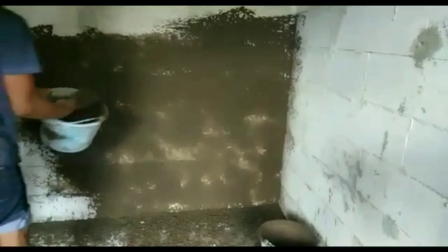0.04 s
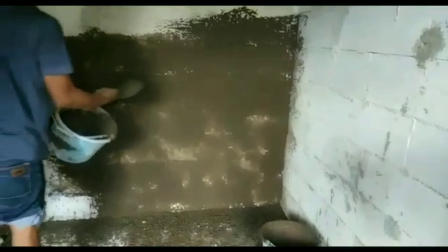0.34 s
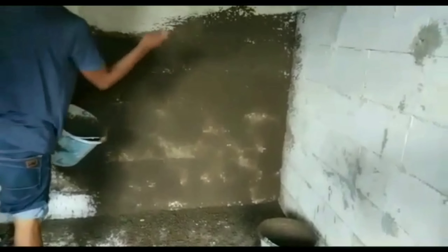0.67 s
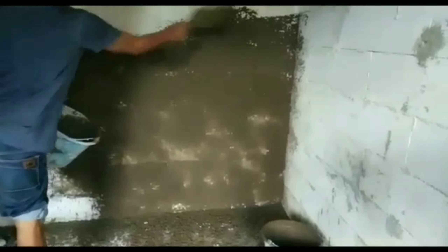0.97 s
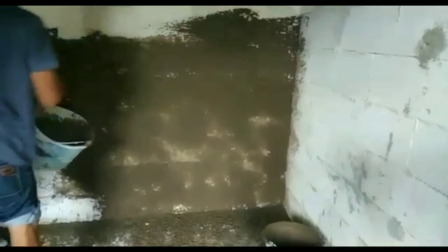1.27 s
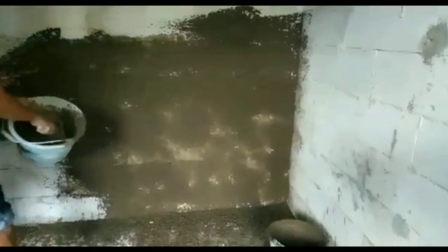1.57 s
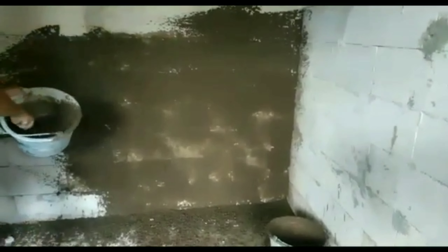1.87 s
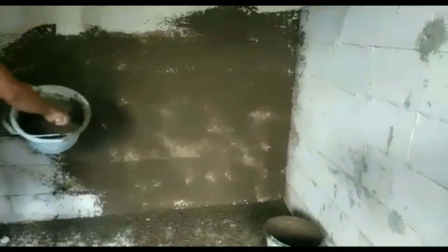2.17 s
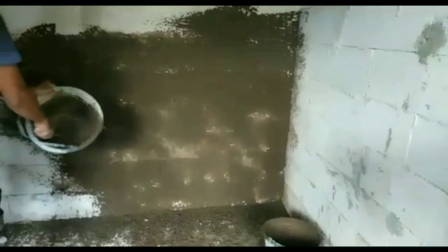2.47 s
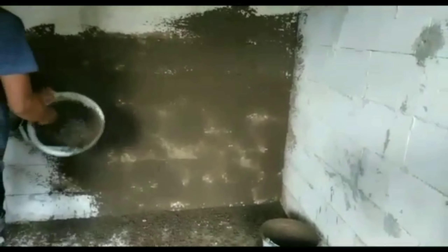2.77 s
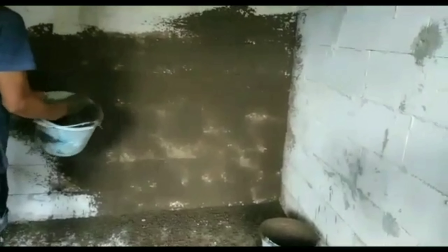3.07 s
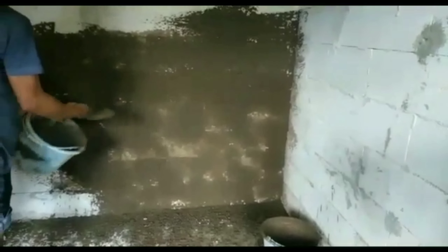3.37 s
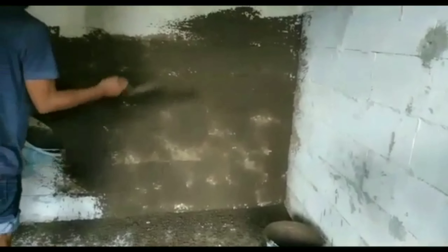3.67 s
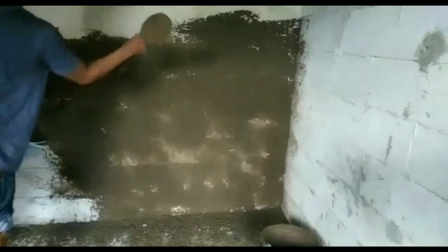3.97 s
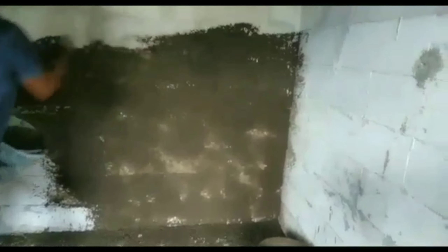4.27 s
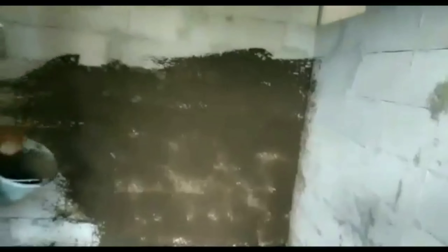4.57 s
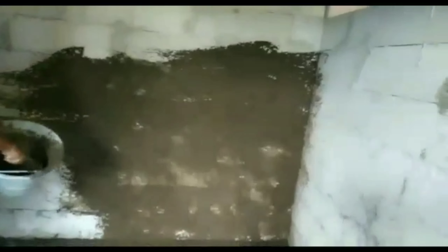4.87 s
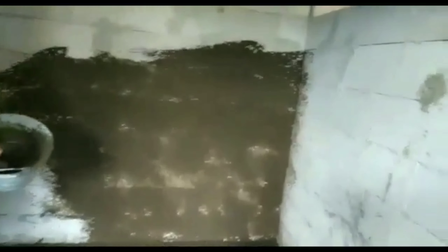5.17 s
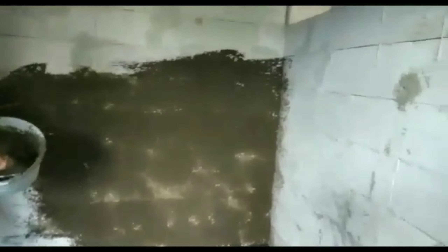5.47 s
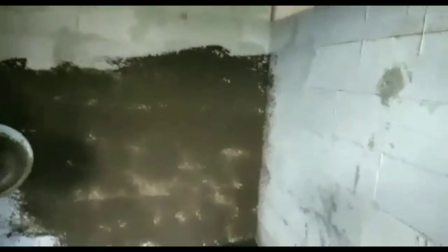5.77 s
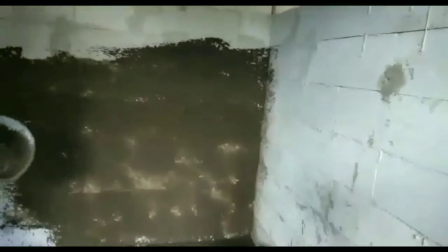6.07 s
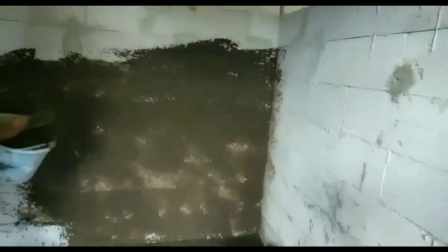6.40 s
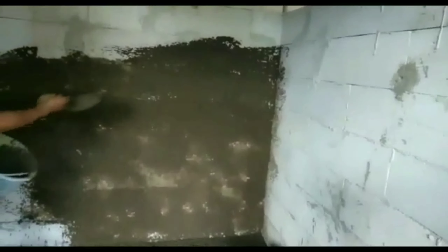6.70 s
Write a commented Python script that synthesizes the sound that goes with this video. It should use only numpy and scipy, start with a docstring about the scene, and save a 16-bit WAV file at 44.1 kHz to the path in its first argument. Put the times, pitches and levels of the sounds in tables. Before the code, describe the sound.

A steel trowel scrapes wet mortar in a plastic bucket and twice slaps a load onto a wall in an echoing room.

```python
"""In a small bare room, a plasterer scoops wet mortar from a plastic bucket and flings it twice at a wall.
The steel trowel grinds through sand, chatters and knocks the bucket, which rings. Each load swishes
through the air and hits the blocks with a slap and a thud, and crumbs tick down. The walls echo,
a low rumble lies underneath, and the microphone makes the highest sounds brighter."""
import sys
import numpy as np
from scipy import signal
from scipy.fft import rfft, irfft
from scipy.io import wavfile

SR = 44100
rng = np.random.default_rng(int(sys.argv[2]) if len(sys.argv) > 2 else 0)


def inscribe(sig):
    """Save sig as 16-bit PCM at rate SR to the path in sys.argv[1].

    A 1-D sig is mono; a 2-D sig holds one channel per row.
    Samples are clipped to [-1, 1] before scaling.
    """
    pcm = np.round(np.clip(np.atleast_2d(sig).T, -1, 1) * 32767)
    wavfile.write(sys.argv[1], SR, pcm.astype(np.int16))


N = 297234
TIME = np.arange(N) / SR

# Table levels are set before mixing. A "t60" is the time in seconds a sound takes to fade by 60 dB.
# loads thrown at the wall:
# (landing time [s], slap [dB], thud [dB], swing length [s], swish [dB], sliding mortar [dB])
THROWS = [(1.065, -24.5, -31.5, 0.046, -45, -51.5), (4.2218, -27.5, -36, 0.14, -42, -59.5)]
# the blade hits the bucket or stabs the mortar; the spot it meets sets the note:
# (time [s], level [dB], gritty edge [dB], note [Hz])
KNOCKS = [(0.213, -38, -93, 831), (1.694, -31, -56, 963), (1.739, -32, -61, 705), (1.796, -29, -40, 780),
          (1.862, -26.5, -52, 927), (1.889, -31, -59, 1280), (2.31, -36.5, -48.5, 783),
          (2.361, -32.5, -48.5, 895), (2.654, -26, -45, 961), (3.231, -42, -60, 736),
          (3.476, -40, -63, 1085), (4.567, -40.5, -46, 1018), (4.841, -39.5, -58, 845),
          (5.157, -37.5, -52.5, 836), (5.63, -48, -63.5, 894), (5.94, -53, -68, 924),
          (6.053, -53, -74, 1286)]
# tone colours of hissing sand, a soft swish and a dull knock: (frequency [Hz], level [dB])
SAND_TONE = [(600, -6), (2000, 2.5), (4000, 0.5), (7000, 3), (10000, -1), (15500, -9)]
SWISH_TONE = [(200, -19), (600, -6), (1000, -5.5), (1350, -5), (2200, -3), (3500, -10.5), (7000, -24),
              (15000, -40)]
KNOCK_TONE = [(90, -28), (350, -4), (900, 1.5), (1500, -2), (2500, -6.5), (4000, -14.5), (10000, -37)]


def scooping():
    """The blade catches and slips over sand: it churns the mortar, rasps and hisses."""
    # tone colours of wet mortar and of the scraping blade: (frequency [Hz], level [dB])
    sludge_tone = [(40, -48.5), (130, -9.5), (205, -12.5), (300, 0), (470, -0.5), (800, 3.5), (1100, -2.5),
                   (1800, -11), (3500, -35), (9000, -56)]
    rasp_tone = [(400, -17.5), (900, -2.5), (1400, 0.5), (1900, -3), (2500, -7), (3300, -11.5),
                 (5000, -20.5), (12000, -48.5)]
    slips = judder(per_s=51, depth_db=4.5)
    churning, grating = (slips * grains(per_s=1800, spread_db=3.5) for _ in range(2))
    sludge = tint(strokes("pressure", release_s=0.04) * churning, sludge_tone)
    rasp = tint(strokes("rasp", release_s=0.051) * grating, rasp_tone)
    # wet sand parts in clumps, so its crackle comes and goes faster than the strokes
    crackle = judder(per_s=80, depth_db=2.6) * grains(per_s=2800, spread_db=4)
    sand = tint(strokes("grinding", release_s=0.025) * crackle, SAND_TONE)
    return gain_of(-5) * sludge + gain_of(-2.5) * sand + gain_of(-1) * rasp


def strokes(part, release_s):
    """Loudness of one part of the scraping: each stroke bites, eases slightly and lets go."""
    # trowel strokes: (start [s], length [s], pressure on the bucket [dB], grinding [dB], rasp [dB])
    trowel_strokes = [(-.03, 0.098, -46, -48.5, -42.5), (0.08, .18, -57.5, -57, -45.5),
                      (0.507, 0.021, -75, -79, -57.5), (1.282, 0.17, -59.5, -57, -56.5),
                      (1.5, 0.27, -53, -49.5, -56), (1.793, 0.051, -35, -56, -43.5),
                      (1.857, 0.11, -35.5, -48, -39.5), (2.073, 0.074, -40, -59.5, -48),
                      (2.176, 0.077, -41, -53, -51), (2.273, 0.18, -38.5, -51, -44),
                      (2.423, 0.15, -37.5, -45, -40.5), (2.611, 0.13, -36.5, -49, -43),
                      (2.759, 0.081, -33, -46.5, -37.5), (2.839, 0.064, -34.5, -44.5, -57.5),
                      (3.072, 0.032, -51.5, -56, -55), (3.242, 0.062, -55, -77, -60.5),
                      (3.36, 0.065, -62, -66.5, -64), (3.669, 0.074, -73.5, -56.5, -81),
                      (3.844, 0.24, -57, -60.5, -64), (4.33, 0.21, -57, -70, -58),
                      (4.622, 0.2, -60, -54, -55.5), (4.853, 0.27, -49.5, -55.5, -55.5),
                      (5.05, 0.098, -45.5, -56.5, -47), (5.234, 0.18, -63.5, -77, -67.5),
                      (5.405, 0.2, -61, -70.5, -66), (5.546, 0.31, -60.5, -65.5, -66),
                      (5.902, 0.061, -56.5, -68.5, -71), (5.991, .22, -62.5, -70.5, -67)]
    bite_s, ease_db = 0.019, 0.5
    gain = np.zeros(N)
    for start, length, pressure, grinding, rasp in trowel_strokes:
        db = {"pressure": pressure, "grinding": grinding, "rasp": rasp}[part]
        t = np.maximum(TIME - start, 0)
        bite = np.minimum(t / bite_s, 1)
        hold = gain_of(db - ease_db * (np.minimum(t / length, 1) - 0.5))
        release = np.exp(-np.maximum(t - length, 0) / release_s)
        gain = np.hypot(gain, bite * hold * release)
    return gain


def slapping():
    """The load cracks on the wall, sprays drops and thumps the blocks; returns (slap, thud)."""
    # tone colours of the sharp slap and the deep thud: (frequency [Hz], level [dB])
    slap_tone = [(100, 2), (400, 7.5), (900, -11), (1800, 11), (2700, 2.5), (4200, 9.5), (6000, 8.5),
                 (9000, 7.5), (15500, -1.5)]
    thud_tone = [(12, -11.5), (27, 6.5), (45, -10), (95, -1.5), (160, -5), (260, -5.5), (350, -17.5),
                 (700, -12), (2000, -51.5)]
    # notes of the struck wall: (pitch [Hz], level [dB], t60 [s])
    wall_notes = [(127, 0, 0.31), (171, -13, 0.23), (224, -7.5, 0.79), (264, -8.5, 0.61), (616, -8.5, 0.42),
                  (637, -1.5, 0.49), (1185, -9, 0.27)]
    times, slap_db, thud_db, *_ = np.transpose(THROWS)
    crack = bursts(times, slap_db, rise_s=0.0003, t60=0.1) * grains(per_s=8300, spread_db=-3.5)
    spray = bursts(times, slap_db, rise_s=0.012, t60=0.5) * grains(per_s=1100, spread_db=12.5)
    squelch = bursts(times, slap_db, rise_s=0.0053, t60=0.24) * rng.standard_normal(N)
    thump = bursts(times, thud_db, rise_s=0.0082, t60=0.74) * rng.standard_normal(N)
    t, wall = TIME[:SR], np.zeros(N)
    swell = 1 - np.exp(-t / 0.0082)
    for start, db in zip(times, thud_db):
        ring = sum(gain_of(note_db - 60 * t / t60) * np.sin(2 * np.pi * (hz * t + rng.random()))
                   for hz, note_db, t60 in wall_notes)
        add(wall, start, gain_of(db) * ring * swell)
    splash = gain_of(-20.5) * tint(spray, SAND_TONE) + gain_of(-4) * tint(squelch, KNOCK_TONE)
    slap = tint(crack, slap_tone) + splash
    thud = gain_of(-1) * tint(thump, thud_tone) + gain_of(-2.5) * wall
    return slap, thud


def swinging():
    """Sleeve and trowel swish while the load slides off the blade, growing until it lands."""
    steepness = 8.5  # how abruptly the arm gathers speed
    swish, slide = np.zeros(N), np.zeros(N)
    for landing, _, _, length, swish_db, slide_db in THROWS:
        to_go = (landing - TIME) / length
        speed = (to_go > 0) / np.sqrt(1 + abs(to_go) ** steepness)
        swish += gain_of(swish_db) * speed
        slide += gain_of(slide_db) * speed
    swish *= rng.standard_normal(N)
    slide *= judder(per_s=80, depth_db=2) * grains(per_s=8000, spread_db=3.5)
    return gain_of(-4) * tint(swish, SWISH_TONE) + gain_of(3) * tint(slide, SAND_TONE)


def bucket():
    """Scraping and knocks make the bucket's wall and the air inside it ring."""
    # notes of the bucket; wider ones die sooner: (pitch [Hz], width [Hz], level [dB])
    bucket_notes = [(122, 17, -10), (165.8, 18, -6.5), (277.8, 34, 0), (331, 8.2, 7.5), (374, 13, 6),
                    (392.5, 7.7, -5.5), (687, 50, -3), (789, 55, -1.5), (876, 54, 1), (946, 14, -1),
                    (1283, 40, -4.5)]
    times, knock_db, *_ = np.transpose(KNOCKS)
    scrapes = gain_of(-2.24) * strokes("pressure", release_s=0.04)
    blows = gain_of(-8.5) * bursts(times, knock_db, rise_s=0.00065, t60=0.046)
    force = (scrapes + blows) * judder(per_s=60, depth_db=2.5) * grains(per_s=1200, spread_db=2)
    t = TIME[:SR // 2]
    ring = sum(gain_of(db) * width * np.exp(-np.pi * width * t) * np.cos(2 * np.pi * hz * t)
               for hz, width, db in bucket_notes)
    return signal.oaconvolve(force, ring / np.linalg.norm(ring))[:N]


def knocking():
    """Steel meets the bucket, muffled by mortar, and crushes a few grains."""
    times, db, edge_db, _ = np.transpose(KNOCKS)
    crush = grains(per_s=12000, spread_db=1.5)
    body = bursts(times, db, rise_s=0.001, t60=0.12) * crush
    edge = bursts(times, edge_db, rise_s=0.001, t60=0.14) * crush
    return gain_of(-3.5) * tint(body, KNOCK_TONE) + gain_of(4) * tint(edge, SAND_TONE)


def knock_notes():
    """Each knock leaves the struck patch of plastic ringing briefly."""
    out, t = np.zeros(N), TIME[:SR // 2]
    swell, t60 = 1 - np.exp(-t / 0.002), 0.15
    for start, db, _, hz in KNOCKS:
        add(out, start, gain_of(db - 60 * t / t60) * swell * np.sin(2 * np.pi * hz * t))
    return gain_of(-3) * out


def chattering():
    """Gritty mortar sticks and slips on the blade, making it buzz on one note for a moment."""
    # buzzes of the blade: (start [s], length [s], pitch [Hz], level [dB])
    chatters = [(1.88, 0.025, 2050, -35), (2.479, 0.042, 1760, -33), (2.865, 0.065, 957, -36.5),
                (4.089, 0.074, 1290, -42)]
    out, width_hz = np.zeros(N), 110
    for start, length, hz, db in chatters:
        t = TIME[:int(length * SR)]
        ring = np.exp(-np.pi * width_hz * t) * np.sin(2 * np.pi * hz * t)
        buzz = signal.fftconvolve(rng.standard_normal(2 * len(t) - 1), ring, "valid")
        add(out, start, gain_of(db) * evened(buzz) * np.sin(np.pi * t / length))
    return out


def crumbs():
    """Small lumps smack with a snap, a short fizz and a dull body; stray sand patters between them."""
    # wet smacks and falling crumbs: (time [s], snap [dB], dull part [dB])
    smacks = [(0.661, -53.5, -48), (0.897, -56.5, -48.5), (0.961, -62.5, -43), (1.391, -53, -36.5),
              (1.527, -40.5, -55), (1.729, -39.5, -34.5), (2.08, -42, -35.5), (2.192, -47.5, -36.5),
              (2.643, -41, -44), (3.382, -54, -64), (3.676, -53.5, -71), (3.7721, -40, -42),
              (3.98, -47, -51), (4.044, -51, -48.5), (4.459, -52.5, -71), (4.929, -44, -40.5),
              (5.578, -57, -53)]
    times, db, dull_db = np.transpose(smacks)
    snap = bursts(times, db, rise_s=0.0002, t60=0.012)
    fizz = gain_of(-3.5) * bursts(times, db, rise_s=0.0006, t60=0.055)
    tick = tint((snap + fizz) * rng.standard_normal(N), SAND_TONE)
    dull = tint(bursts(times, dull_db, rise_s=0.00024, t60=0.062) * rng.standard_normal(N), SWISH_TONE)
    falling = judder(per_s=12, depth_db=3) * grains(per_s=300, spread_db=4)
    patter = tint(background_level() * falling, SAND_TONE)
    return tick + gain_of(-3) * dull + gain_of(-21) * patter


def blade_tap(start_s=3.771, db=-53, t60=0.25, notes_hz=(3490, 5280)):
    """Tapped once, the bare steel rings on two high notes, soon stilled by the hand."""
    out, t = np.zeros(N), TIME[:SR // 2]
    ring = sum(np.sin(2 * np.pi * hz * t) for hz in notes_hz)
    add(out, start_s, gain_of(db - 60 * t / t60) * ring)
    return out


def squeaking(start_s=0.41, length_s=0.24, hz=1300, sag_hz_per_s=330, db=-63):
    """One faint, thin squeak that wavers and sags in pitch."""
    out, t = np.zeros(N), TIME[:int(length_s * SR)]
    pitch = (hz - sag_hz_per_s * t) * judder(per_s=50, depth_db=0.1)[:len(t)]
    swell = np.sqrt(np.sin(np.pi * t / length_s))
    add(out, start_s, gain_of(db) * swell * np.sin(2 * np.pi * np.cumsum(pitch) / SR))
    return out


def room(x, echo_db, gap_s, paths=5, changes_per_s=18):
    """Direct sound plus echoes whose paths keep changing as the trowel and the worker move."""
    place = TIME * changes_per_s
    echoes = np.zeros(N)
    for k in range(paths):
        distance = abs((place - k) % paths - paths / 2)
        nearness = np.cos(np.pi / 2 * np.minimum(distance, 1))
        echoes += signal.oaconvolve(x * nearness, reflections(gap_s))[:N]
    echo_gain = gain_of(echo_db)
    return (x + echo_gain * echoes) / np.hypot(1, echo_gain)


def reflections(gap_s, per_s=4000):
    """After a short gap, bare walls send back dense echoes; the high sounds die first."""
    # how long the room rings: (frequency [Hz], t60 [s])
    ring_times = [(100, 0.48), (400, 0.48), (1500, 0.31), (5000, 0.27), (15000, 0.22)]
    clicks = rng.choice([-1., 1.], SR) * (rng.random(SR) < per_s / SR) * (TIME[:SR] > gap_s)
    hz, when, spectrum = signal.stft(clicks, SR, nperseg=256)
    fade = gain_of(-60 * when / read(ring_times, hz)[:, None])
    _, tail = signal.istft(spectrum * fade, SR, nperseg=256)
    return tail / np.linalg.norm(tail)


def rumble():
    """A low, distant rumble."""
    # tone colour of the rumble: (frequency [Hz], level [dB])
    rumble_tone = [(25, 5), (60, -9), (110, 1.5), (165, -1.5), (230, -10), (700, -14), (2000, -18.5),
                   (10000, -39)]
    return gain_of(-5) * background_level() * tint(rng.standard_normal(N), rumble_tone)


def background_level(fade_from_s=4.35, fade_db_per_s=16):
    """Loudness of the rumble and the stray sand: steady, then falling steadily in level."""
    return gain_of(-54 - fade_db_per_s * np.maximum(TIME - fade_from_s, 0))


def grains(per_s, spread_db):
    """Random clicks of uneven size; a positive spread makes a few stand out."""
    sizes = gain_of(spread_db * np.minimum(rng.exponential(1, N), 4))
    return evened(sizes * rng.choice([-1, 1], N) * (rng.random(N) < per_s / SR))


def judder(per_s, depth_db):
    """A multiplier that wobbles at random, like something catching and slipping."""
    hz = np.fft.rfftfreq(N, 1 / SR)
    slow_noise = irfft(rfft(rng.standard_normal(N)) / (1 + (hz / per_s) ** 4), N)
    return evened(gain_of(depth_db * evened(slow_noise)))


def bursts(times, dbs, rise_s, t60):
    """Loudness over time of blows that swell quickly and die away."""
    out, t = np.zeros(N), TIME[:SR]
    for start, db in zip(times, dbs):
        add(out, start, gain_of(db - 60 * t / t60) * (1 - np.exp(-t / rise_s)))
    return out


def tint(x, tone):
    """Gives plain noise a tone colour while keeping its power."""
    power = np.mean(gain_of(read(tone, np.linspace(0, SR / 2, SR // 4))) ** 2)
    return colour(x, tone) / np.sqrt(power)


def colour(x, tone, size=8192):
    """Turns each frequency up or down, with a filter that rings only after a sound arrives."""
    hz = abs(np.fft.fftfreq(size, 1 / SR))
    log_gain = np.log(gain_of(read(tone, hz)))
    response = np.exp(np.conj(signal.hilbert(log_gain)))
    taps = np.fft.ifft(response).real[:size // 2]
    return signal.oaconvolve(x, taps)[:len(x)]


def read(table, hz):
    """Looks up frequencies in a table, gliding between its rows on a pitch scale."""
    row_hz, values = np.transpose(table)
    return np.interp(np.log(hz + 1), np.log(row_hz), values)


def add(mix, start_s, sound):
    """Mixes a sound in at the given time."""
    part = mix[max(round(start_s * SR), 0):][:len(sound)]
    part += sound[:len(part)]


def gain_of(db):
    """Turns decibels into a multiplier."""
    return 10 ** (np.asarray(db) / 20)


def evened(x):
    """Scales a signal to an average power of 1."""
    return x / np.sqrt(np.mean(x ** 2) + 1e-20)


def scene():
    """Trowel, bucket and splatter echo in the room; the thud and rumble get no echo."""
    slap, thud = slapping()
    trowel = scooping() + chattering() + squeaking() + knocking() + swinging()
    work = room(trowel, echo_db=-0.5, gap_s=0.003)
    ringing = room(bucket() + knock_notes() + blade_tap(), echo_db=-9, gap_s=0.003)
    splatter = room(slap + crumbs(), echo_db=-2.5, gap_s=0.0054)
    return (work + ringing + splatter + thud + rumble())[None]


def record(dry):
    """The microphone boosts parts of the treble and cuts off the very top."""
    # the microphone's peaks and dips: (frequency [Hz], boost [dB])
    microphone_tone = [(5400, -2), (6600, 4), (7400, 0), (8600, -3.5), (10500, -3), (13000, 4),
                       (14300, 11.5), (15300, 17)]
    bright = colour(dry[0], microphone_tone)
    top_cut = signal.firwin(1023, cutoff=15550, window=("kaiser", 8), fs=SR)
    return signal.oaconvolve(bright, top_cut, "same")[None]


dry = scene()
out = record(dry)
inscribe(out)
```